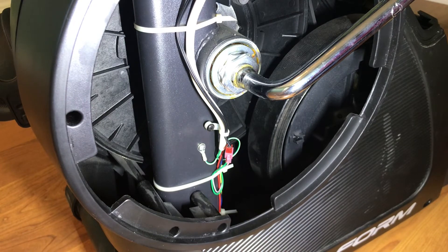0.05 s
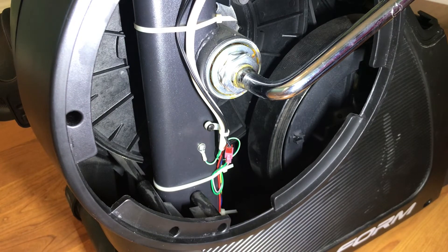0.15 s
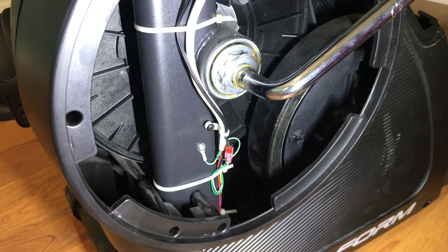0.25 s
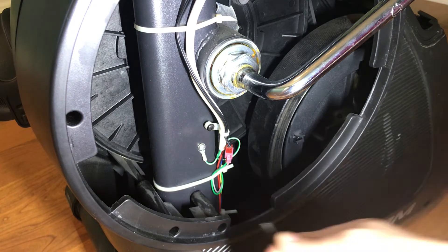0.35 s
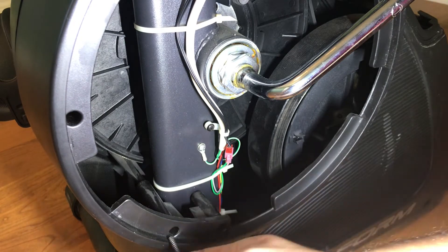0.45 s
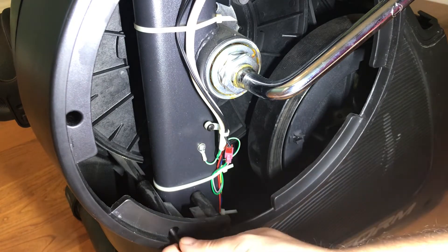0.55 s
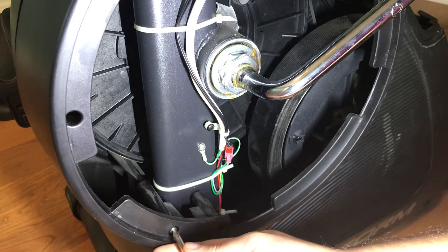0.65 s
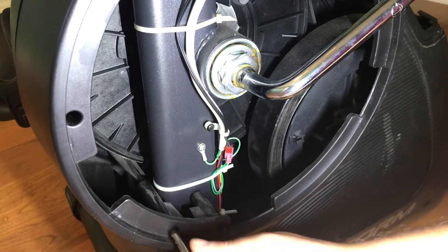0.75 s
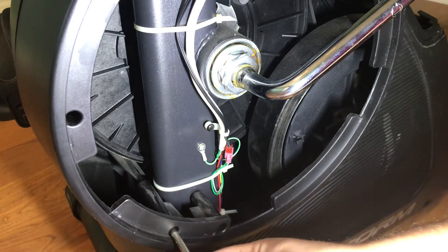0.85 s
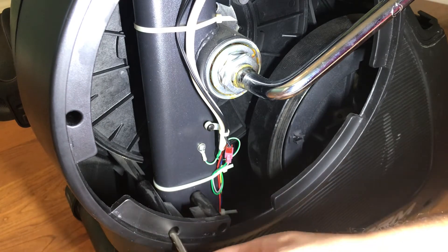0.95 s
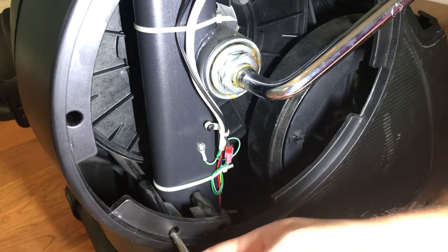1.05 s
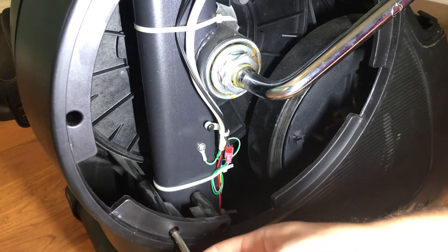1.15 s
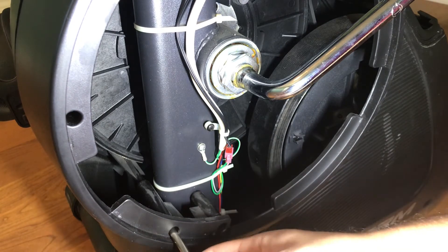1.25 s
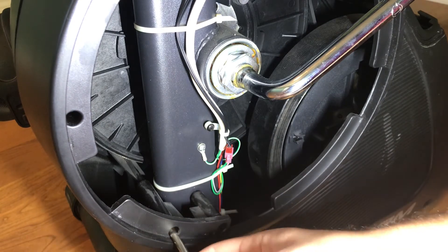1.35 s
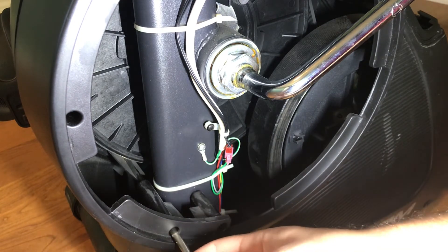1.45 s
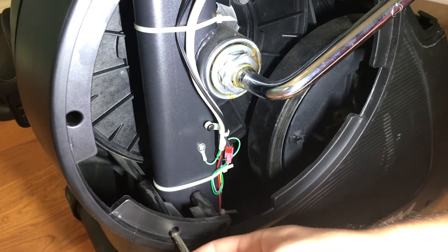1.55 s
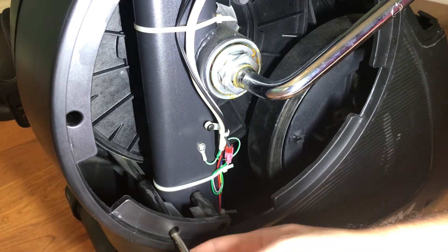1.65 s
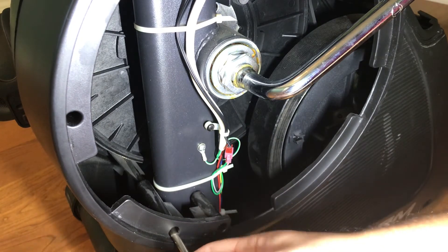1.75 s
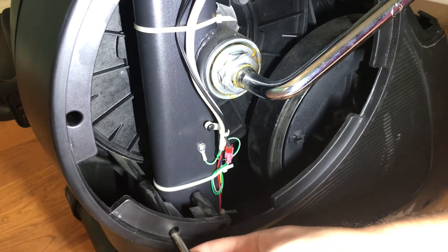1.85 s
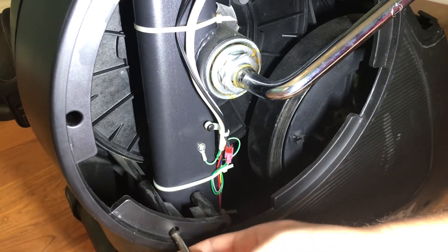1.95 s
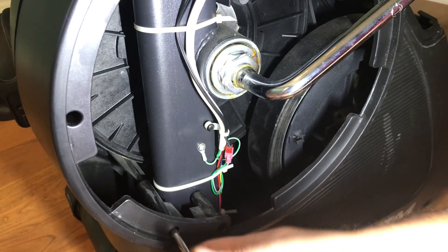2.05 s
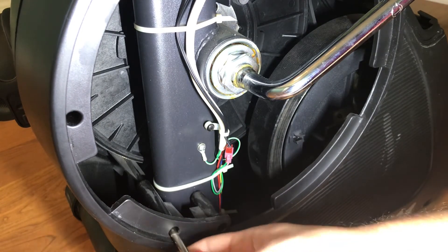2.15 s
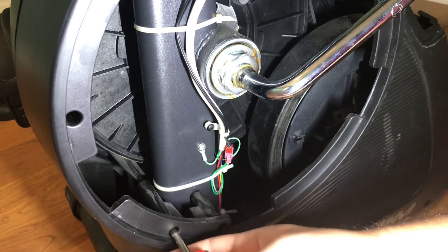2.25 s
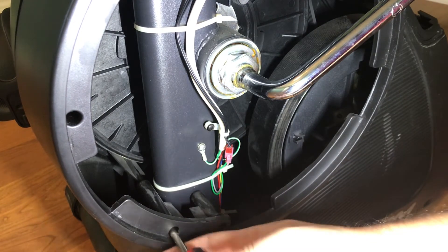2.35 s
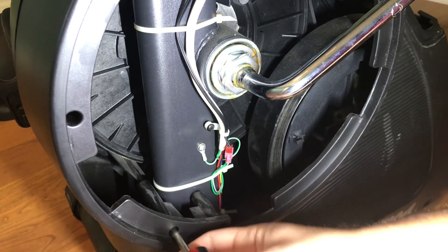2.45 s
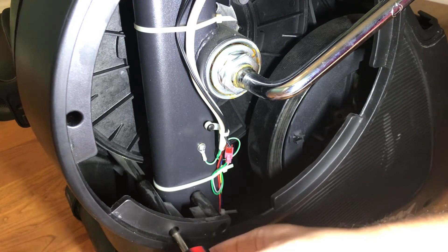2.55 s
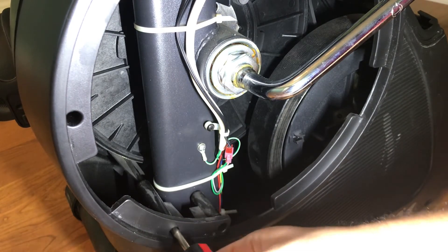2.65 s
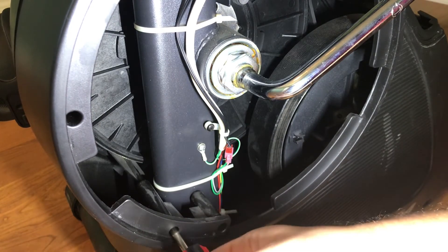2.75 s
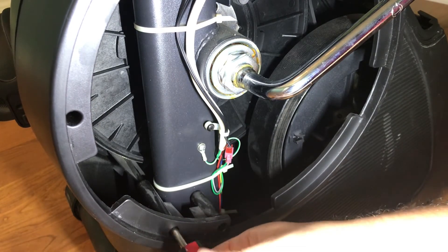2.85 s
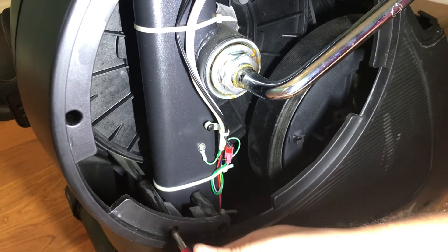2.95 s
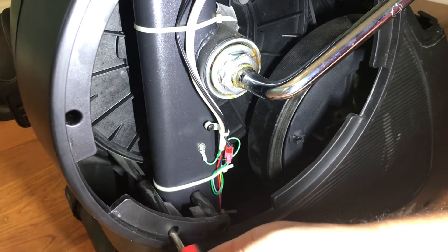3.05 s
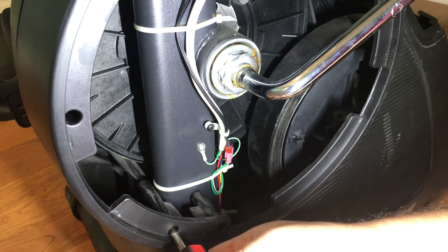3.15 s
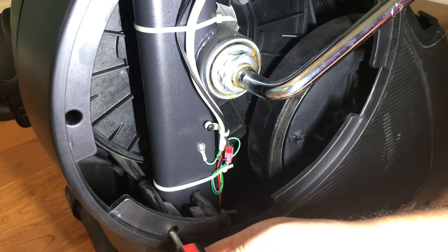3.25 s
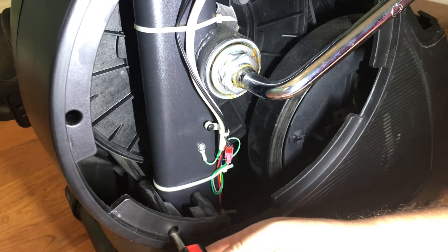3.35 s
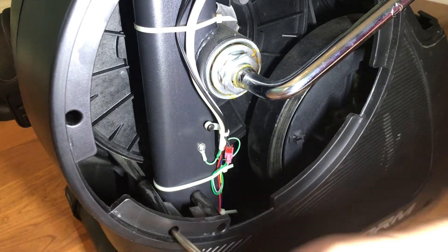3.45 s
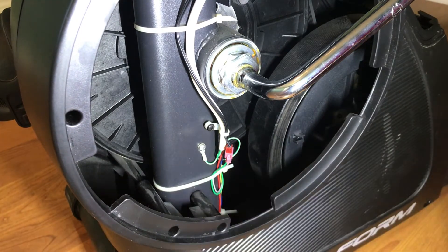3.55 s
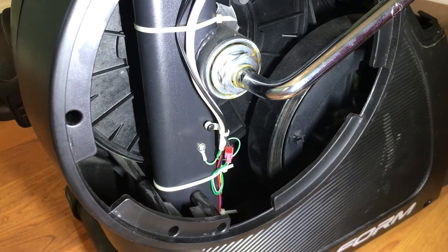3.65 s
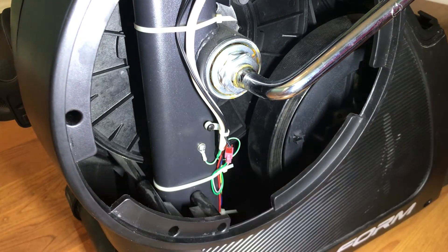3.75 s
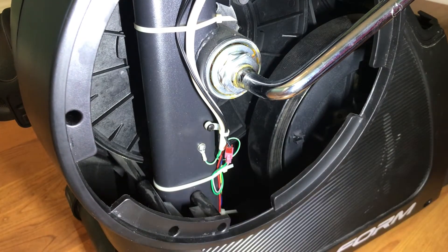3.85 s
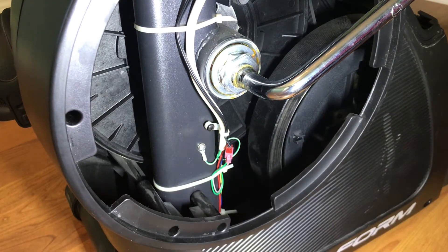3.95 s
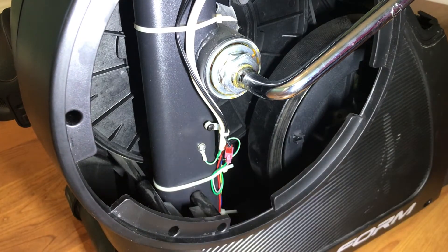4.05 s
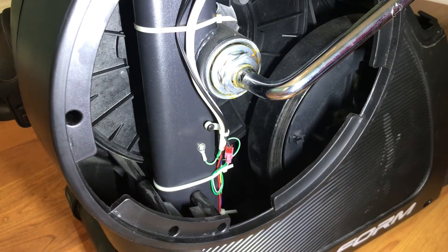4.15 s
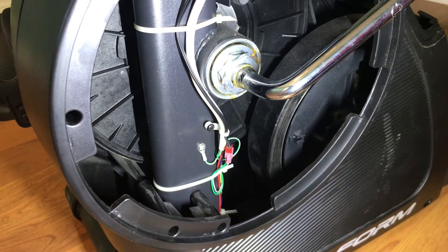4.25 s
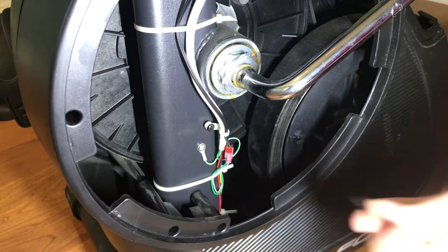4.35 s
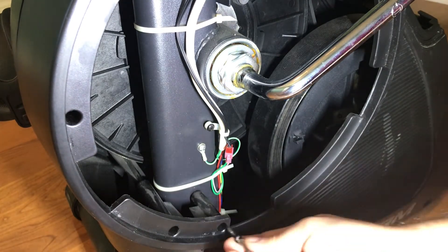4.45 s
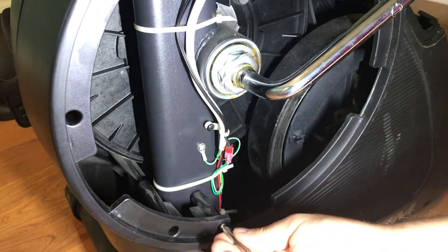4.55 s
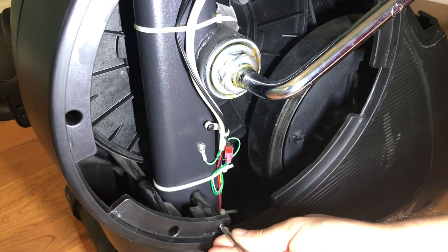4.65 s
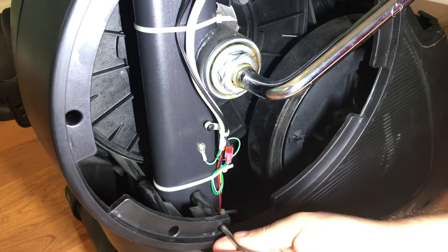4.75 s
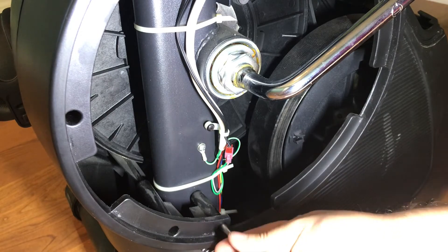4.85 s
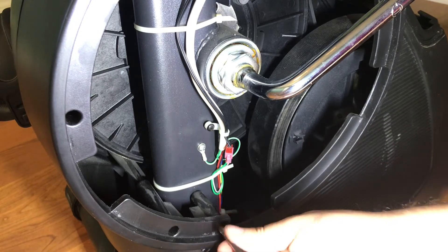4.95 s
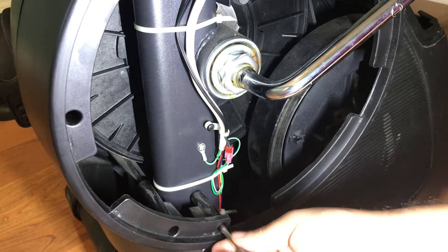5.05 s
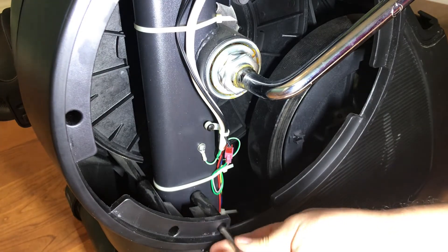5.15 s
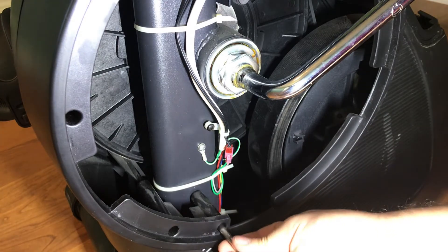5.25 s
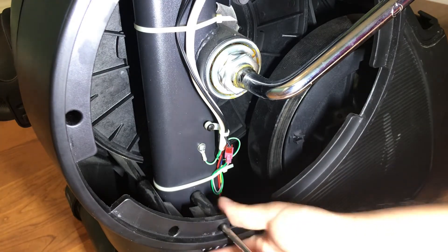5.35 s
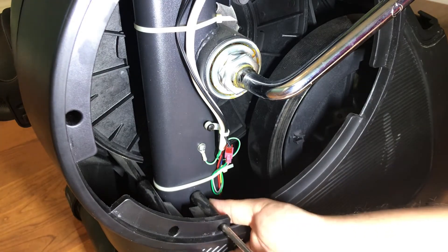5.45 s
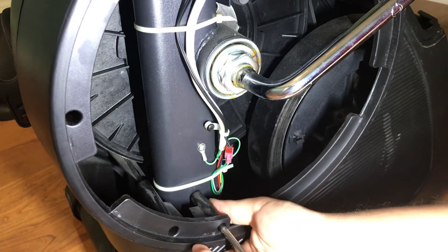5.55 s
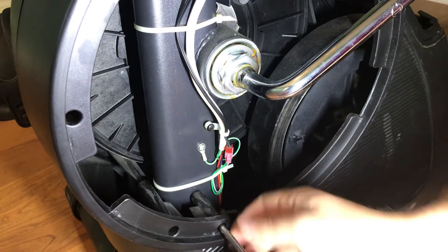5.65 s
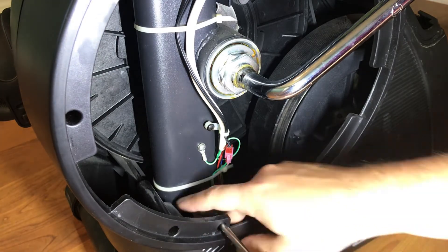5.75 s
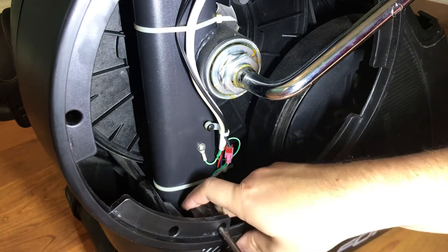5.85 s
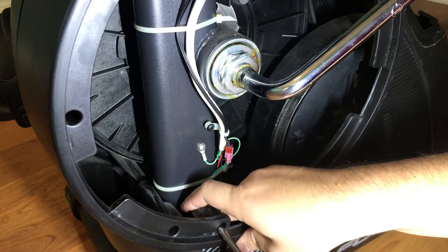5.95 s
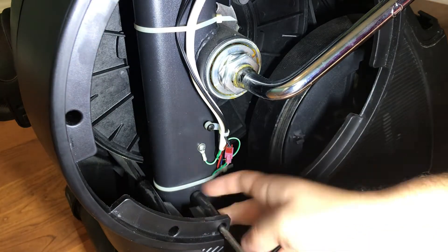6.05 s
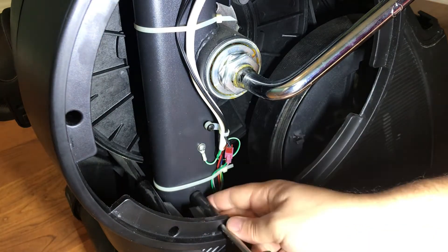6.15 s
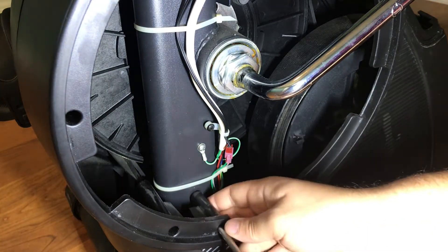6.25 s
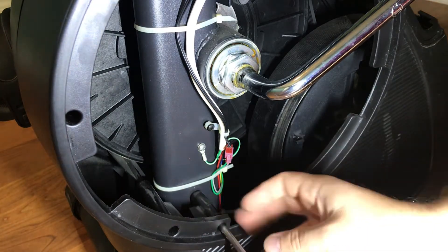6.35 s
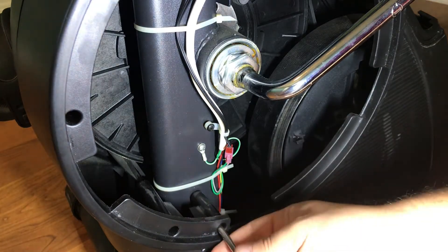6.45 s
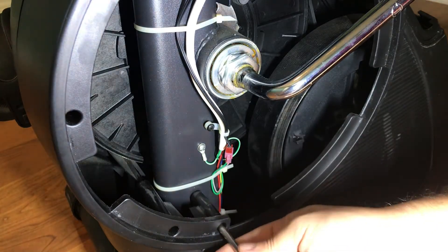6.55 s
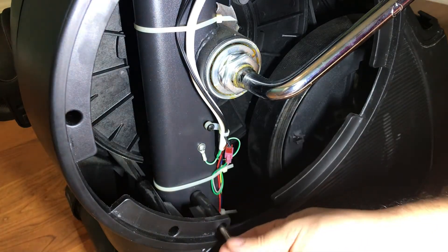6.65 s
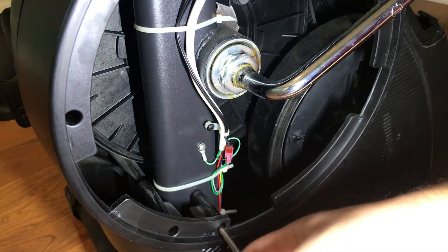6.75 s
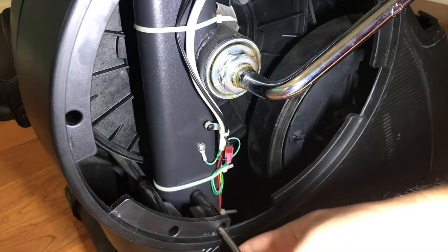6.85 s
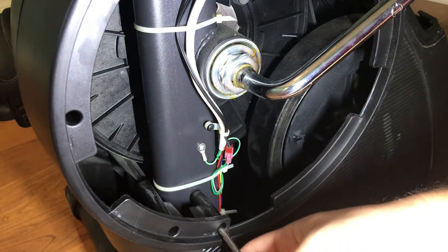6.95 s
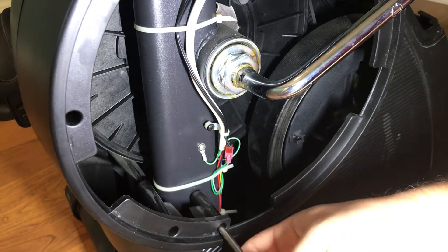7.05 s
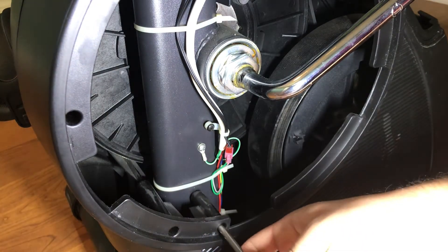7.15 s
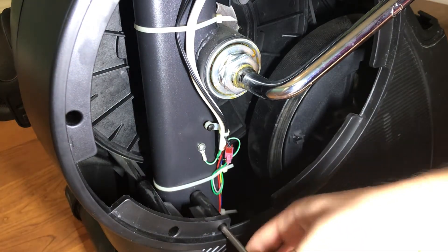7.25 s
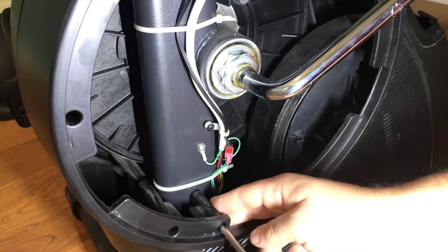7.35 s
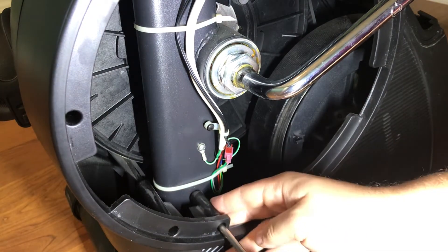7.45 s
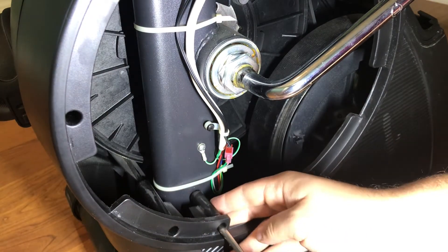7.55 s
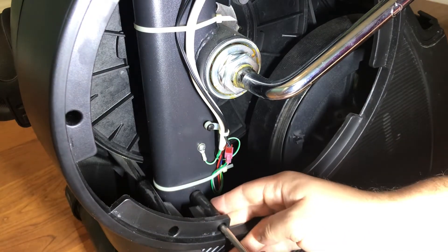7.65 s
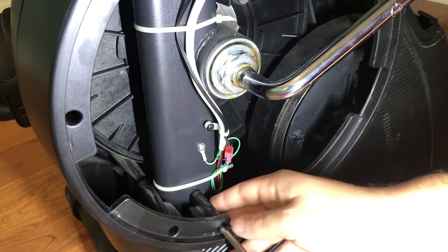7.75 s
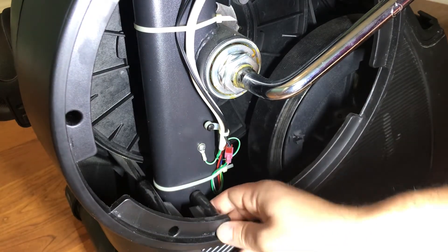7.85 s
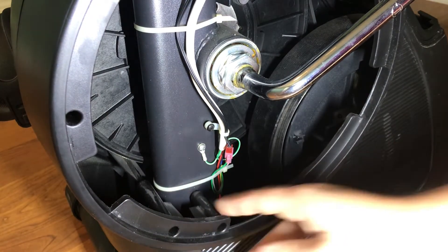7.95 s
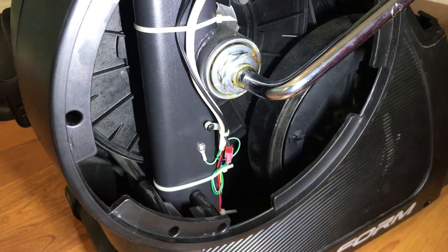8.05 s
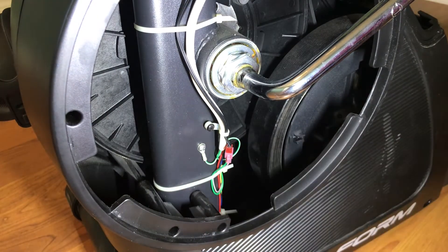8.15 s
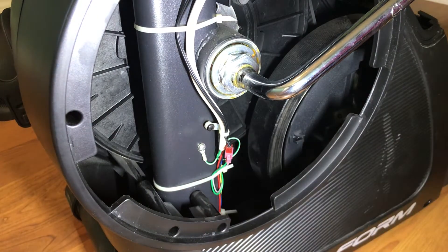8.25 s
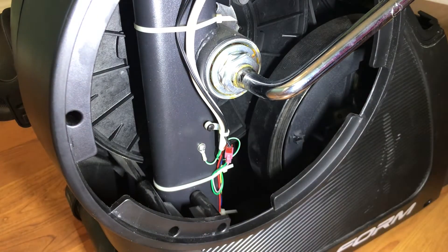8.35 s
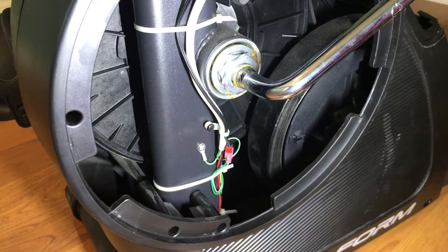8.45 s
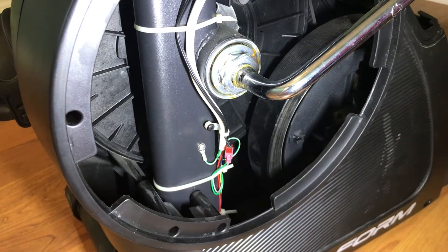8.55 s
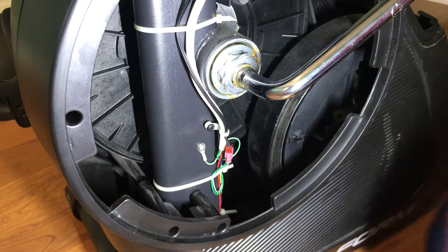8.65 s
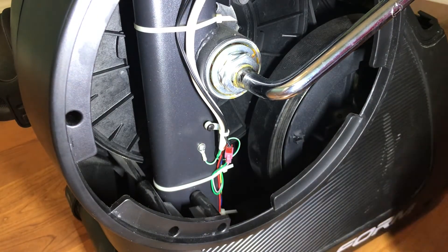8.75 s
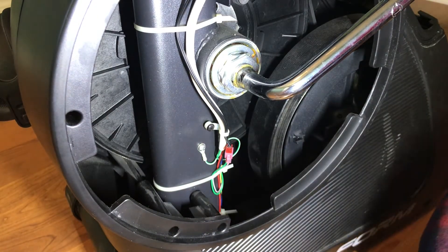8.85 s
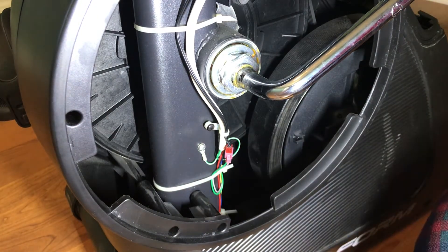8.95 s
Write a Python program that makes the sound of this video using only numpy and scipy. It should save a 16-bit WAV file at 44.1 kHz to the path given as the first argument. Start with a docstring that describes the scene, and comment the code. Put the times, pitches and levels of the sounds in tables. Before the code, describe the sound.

Close, dry cracks and low grinding of a screw thread in a plastic shell, one short squeak, then light steel rattling, scraping and taps.

```python
"""Close to the microphone in a small room, a hand turns a long screw into a hollow plastic cover.
After soft knocks and brushes the thread sticks and slips: cracks of filtered noise over a low grinding
of countless tiny slips, with one early squeak, a rough gliding tone.
Then fingers fit a second screw: its loose steel shank rattles, scrapes and pings in the hole.
Skin brushes and ticks at the end; the room's murmur and a faint hum lie behind it all."""
import sys
import numpy as np
from scipy import signal
from scipy.fft import irfft
from scipy.io import wavfile
from scipy.ndimage import uniform_filter1d

SR = 44100
rng = np.random.default_rng(int(sys.argv[2]) if len(sys.argv) > 2 else 0)


def master_out(mix):
    """Clip the mix to full scale and print it as 16-bit PCM to the path in sys.argv[1]."""
    frames = np.transpose(np.atleast_2d(mix))
    ceiling = np.clip(frames, -1, 1)
    pcm = np.round(ceiling * 32767).astype(np.int16)
    wavfile.write(sys.argv[1], SR, pcm)


N = 396900
TIME = np.arange(N) / SR
HZ = np.fft.rfftfreq(4096, 1 / SR)
MEDIUM_DB = -40  # level of a medium blow

# Levels in all tables are relative: each layer adds its own trim.
# points of contact on the cover: (wall resonance [Hz], lean of the steel from snap to ping [dB],
# level of the resonance [dB], its fade [s])
DULL = (1090, -2, -5, 0.04)
HOLLOW = (1587, -3, -3.5, 0.15)
WOODY = (2065, 8.5, -2, 0.04)
SHARP = (2400, -0.7, -2.5, .0017)
BRIGHT = (3300, 5.9, -6, 0.2)
CRISP = (3570, -7.5, -10, .001)
STEELY = (4135, 3, 0.5, 0.2)
# resonances of the plastic cover: (frequency [Hz], width [Hz], height over the dense modes between [dB])
COVER = [(247.5, 21.7, 21.5), (312.6, 39, 13.5), (479, 20, 18), (887, 13, 4), (958, 16, 6.5),
         (1060, 120, 4.5), (1207, 48, 8.5), (1333, 18, 10.5), (1507, 21, 11), (1588, 43, 10),
         (2200, 140, 2.5), (2380, 100, 1.5), (2840, 48, -1.5)]
# spectrum of the shell's thud: (frequency [Hz], level [dB per Hz])
THUD = [(60, -46.5), (130, -27), (200, -2), (300, -7.5), (600, -4.5), (850, -7), (1500, -33)]
# spectrum of the grit in rubbing contact: (frequency [Hz], level [dB per Hz])
GRIT = [(100, -52.5), (400, -4), (700, -6.5), (1300, -1), (2500, -16), (5000, -11.5), (8000, -20),
        (16000, -22)]


def amp(db):
    """Decibels to gain."""
    return 10 ** (np.asarray(db) / 20)


def unit(x):
    """Scales to rms 1."""
    return x / np.sqrt(np.mean(x ** 2) + 1e-20)


def sized(x, db):
    """Scales a short sound so that its energy equals that of 10 ms at this level."""
    return x * amp(db) * np.sqrt(SR / 100 / np.sum(x ** 2))


def read(points, hz=HZ):
    """Reads a table on a log-frequency axis."""
    f, value = np.transpose(points)
    return np.interp(np.log(hz + 1), np.log(f), value)


def along(curve, s):
    """Reads a curve at time s."""
    return np.interp(s, *np.transpose(curve))


def add(mix, s, sound):
    """Mixes a sound in at time s."""
    part = mix[max(round(s * SR), 0):][:len(sound)]
    part += sound[:len(part)]


def peaks(modes):
    """Gain in dB of resonances that stand above a flat bed."""
    power = sum(amp(db) ** 2 / (1 + (2 * (HZ - hz) / width) ** 2) for hz, width, db in modes)
    return 10 * np.log10(1 + power)


def varied(modes, spread_db=2, detune=0):
    """Each contact excites the resonances in its own proportions; a changing grip also shifts them."""
    return peaks([(hz * (1 + detune * rng.standard_normal()), width, db + spread_db * rng.standard_normal())
                  for hz, width, db in modes])


def hump(hz, octaves, steepness):
    """Gain in dB of a broad band around hz."""
    return -10 * np.log10(1 + abs(np.log2((HZ + 1) / hz) / octaves) ** steepness)


def colour(x, db):
    """Causal filter with this gain: resonances ring after the blow, never before."""
    mirrored = np.r_[db, db[-2:0:-1]]
    log_gain = np.log(amp(np.maximum(mirrored, db.max() - 100)))
    minimum_phase = np.exp(np.conj(signal.hilbert(log_gain)))
    response = irfft(minimum_phase[:len(HZ)])
    return signal.oaconvolve(x, response)[:len(x)]


def burst(fade, rise=0.00026):
    """A dense rush of noise that swells and fades quickly, as a blow scatters (times in s)."""
    t = np.arange(len(HZ) * 2) / SR
    return rng.standard_normal(len(t)) * np.exp(-t / max(fade, 1e-4)) * (1 - np.exp(-t / rise))


def ring(hz, fade, rise):
    """A single resonance swinging freely and dying away, cut off after 46 ms (times in s)."""
    t = np.arange(len(HZ)) / SR
    return np.sin(2 * np.pi * hz * t) * np.exp(-t / fade) * (1 - np.exp(-t / rise))


def blows(rows, ping_growth, thud_lag, scatter):
    """Thud, ping and snap in dB over each blow's level: heavy blows thud relatively less."""
    # the shell's thud relative to a medium blow: (time [s], level [dB])
    thud_share = [(.78, -10.5), (1.05, -4.5), (2.0, -11.5), (2.84, -14.5), (3.4, -10.5), (5.4, -14.5),
                  (5.68, -8), (5.9, -35), (6.24, -15), (6.4, -10), (6.85, 1.5), (7.15, -9.5), (7.3, -5.5),
                  (7.9, -10)]
    detune = 1 + scatter * rng.standard_normal(len(rows))  # no two blows land on quite the same point
    out = []
    for (s, db, (hz, lean, _, _), hard), off in zip(rows, detune):
        thud = along(thud_share, s) - thud_lag * (db - MEDIUM_DB)
        ping = hard + ping_growth * max(hard, 0) + lean / 2
        snap = hard - lean / 2
        out.append((s, db, hz * off, thud, ping, snap))
    return out


def chatter(curve, level_db, spread_db, hard_db, hard_spread_db, count):
    """Weak catches of the thread, unevenly spaced, their strength following the grinding."""
    from_s, to_s = 1.15, 3  # the thread bites hardest in between
    place, spot = rng.random((count, 2)).T
    size, hard = rng.standard_normal((count, 2)).T
    s = from_s + (to_s - from_s) * (np.arange(count) + place) / count
    level = along(curve, s) + level_db + spread_db * size
    spots = [(DULL, HOLLOW, SHARP, BRIGHT)[k] for k in (spot * 4).astype(int)]
    return list(zip(s, level, spots, np.minimum(hard_db + hard_spread_db * hard, 1)))


def clicks(rows, screw, fade, smear, octaves, shell_scale, knock_db, thud_db, ping_db, snap_db, lead_in_db):
    """Each blow knocks the wall, thuds in the shell, rings the screw and snaps at the contact."""
    # spectrum of the struck steel: (frequency [Hz], level [dB per Hz])
    ping_spectrum = [(100, -60), (2300, -36), (3400, -11), (3900, -9.5), (5400, -11.5), (6200, -22.5),
                     (9000, -27.5)]
    # spectrum of the snap at the contact: (frequency [Hz], level [dB per Hz])
    snap_spectrum = [(100, -66), (3500, -38), (5000, -9.5), (5900, -0.5), (7500, -2), (11000, -3),
                     (16000, -15.5)]
    plastic, metal = np.zeros(N), np.zeros(N)
    wall, shell = hump(1660, 1.496, 8.2), read(THUD, HZ * shell_scale)
    for s, db, hz, thud, ping, snap in rows:
        cover, steel = varied(COVER), varied(screw, detune=0.006)
        # weak slips are short rubs that swell; strong ones crack at once
        rise = 0.00059 + smear * np.clip((-46.5 - db) / 10, 0, 1)
        # the point of contact sets the broad colour of the knock
        knock = colour(burst(fade + rise / 2, rise), cover + wall + hump(hz, octaves, 6.8))
        add(plastic, s, sized(knock, db + knock_db))
        # the hand resting on the shell half damps its low resonances
        thump = colour(burst(2.5 * fade, rise=0.0028), cover / 2 + shell)
        add(plastic, s, sized(thump, db + thud + thud_db))
        # a harder contact is shorter, so its snap reaches higher
        edge = 0.98 * np.clip(snap + 4, -6, 6) * np.log2(np.maximum(HZ / 7000, 1))
        crack = colour(burst(.5 * fade + rise / 2, rise / 2), steel + read(snap_spectrum) + edge)
        add(plastic, s, sized(crack, db + snap + snap_db))
        # the harder the steel is struck, the more of its sound lies in the first instant
        steel_fade = 0.85 * fade * amp(-.35 * max(ping, 0))
        clink = colour(burst(steel_fade, rise), steel + read(ping_spectrum))
        add(metal, s, sized(clink, db + ping + ping_db))
        # a faint gritty burst comes a few milliseconds before each blow
        lead_in = colour(burst(fade, rise=0.00033), cover + steel + read(GRIT))
        add(plastic, s - rng.uniform(.002, 0.0065), sized(lead_in, db + lead_in_db))
    return plastic, metal


def wall_ring(rows, level_db, hard_loss, scatter, rise=.0016):
    """The point of contact picks out one wall resonance, the more clearly the softer the blow is."""
    out = np.zeros(N)
    for (s, db, (hz, _, ring_db, fade), hard), off in zip(rows, rng.standard_normal(len(rows))):
        tone = ring(hz * (1 + scatter * off), fade, rise)
        add(out, s, sized(tone, db + ring_db + level_db - hard_loss * hard))
    return out


def friction(curve, grit_db, shudder_db, shudder_growth, per_s, spread_db, jolts_per_s,
             clump_db=3, octaves=0.5, count=14):
    """Countless tiny slips, each in one of many pitch bands, excite the cover; sparser jolts shake the shell."""
    s, grit = np.transpose(curve)
    shudder = grit.max() + shudder_growth * (grit - grit.max())  # the shell's shudder follows the rubbing
    sizes = rng.choice([-1, 1], N) * amp(spread_db * np.minimum(rng.exponential(1, N), 2.5))
    slips = sizes * (rng.random(N) < per_s / SR)
    jolts = sizes * (rng.random(N) < jolts_per_s / SR)
    spot, grains = rng.integers(0, count, N), np.zeros(N)
    for k, hz in enumerate(np.geomspace(750, 12000, count)):
        grain = colour(burst(0.0038, rise=0.00037), hump(hz, octaves, 2.5))
        grains += signal.oaconvolve(slips * (spot == k), grain)[:N]
    high = unit(colour(grains, read(GRIT) + 0.51 * peaks(COVER)))
    high *= amp(np.interp(TIME, s, grit) + grit_db)
    low = unit(colour(jolts, read(THUD) + 0.76 * peaks(COVER) + hump(313, 0.89, 5.2)))
    low *= amp(np.interp(TIME, s, shudder) + shudder_db)
    # the slips come in bunches
    clumps = unit(uniform_filter1d(uniform_filter1d(rng.standard_normal(N), 700), 350))
    ends = np.clip(np.minimum(TIME - s[0], s[-1] - TIME) / 0.02, 0, 1)
    return (high + low) * amp(clump_db * clumps) * ends


def rubs(rows, slips_per_s=750, spread_db=4, fade=0.0012, octaves=0.89, tilt_db=-3.0, level_db=-1):
    """Each scrape is a quick, uneven train of tiny slips that swells and dies."""
    out, tilt = np.zeros(N), tilt_db * np.log2(np.maximum(HZ / 1000, 1))
    for s, db, length, hz in rows:
        train, count = np.zeros(2 * len(HZ)), max(round(length * slips_per_s), 2)
        for place in (np.arange(count) + rng.random(count)) / count:
            swell = np.sqrt(np.sin(np.pi * place))
            add(train, place * length, burst(fade) * swell * amp(spread_db * rng.standard_normal()))
        scrape = colour(train, hump(hz, octaves, 3.45) + tilt + 0.59 * varied(COVER))
        add(out, s, sized(scrape, db + level_db))
    return out


def squeak(jitter=0.085, rasp=0.55, level_db=-1, octave=0.12):
    """Slips of the thread follow each other so fast that they become a rough tone."""
    # the squeaking thread: (time [s], level [dB], pitch [Hz])
    glide = [(.69, -62, 1309), (0.728, -50, 1287), (.738, -37, 1254), (0.746, -48, 1218), (.757, -50, 1200),
             (0.768, -40, 1170), (0.779, -45, 1135)]
    s, db, hz = np.transpose(glide)
    wander = unit(uniform_filter1d(rng.standard_normal(N), 60))
    phase = 2 * np.pi * np.cumsum(np.interp(TIME, s, hz) * (1 + jitter * wander)) / SR
    rub = unit(colour(rng.standard_normal(N) * (1 + np.cos(phase)), hump(4000, 0.16, 1.7)))
    tone = unit(np.sin(phase) + octave * np.sin(2 * phase))
    stroke = amp(np.interp(TIME, s, db) + level_db) * (TIME > s[0]) * (TIME < s[-1])
    return colour((tone + rasp * rub) * stroke, hump(3130, 1.43, 40))  # the small contact radiates no bass


def shank_ring(rows, scatter=0.007, rise=0.00053, spread_db=1.5):
    """Each tap sets the loose screw bending: brief, nearly pure pings that the fingers damp."""
    # bending modes of the loose screw: (frequency [Hz], fade [s], level [dB])
    bending = [(4560, .0021, -6), (4135, .002, -17), (7960, .0015, -20)]
    out = np.zeros(N)
    for s, db, _, _, ping, _ in rows:
        for hz, fade, mode_db in bending:
            off, size = rng.standard_normal(2)
            tone = ring(hz * (1 + scatter * off), fade, rise)
            add(out, s, sized(tone, db + ping + mode_db + spread_db * size))
    return out


def skids(rows, level_db=-12.0, length=.024, delay=0.0066):
    """After a tap the loose screw skids on a little way across the plastic."""
    return [(s + delay, min(db, MEDIUM_DB) + level_db, length * (.6 + chance), hz * (1 + chance))
            for (s, db, (hz, *_), _), chance in zip(rows, rng.random(len(rows)))]


def hand(grain_db=3, rush_db=-6.5, tone_db=-8.5):
    """Low, soft knocks of the shell in noise and tone, brushing skin as grainy hiss, and tiny dry ticks."""
    # low, soft knocks of the shell, some of them beneath cracks and taps: (time [s], level [dB], centre [Hz])
    soft_knocks = [(0.264, -52, 376), (0.368, -58, 448), (.778, -29.5, 898), (.78, -42, 480),
                   (0.971, -51, 815), (1.018, -38, 453), (1.875, -46, 328), (2.103, -43.5, 350),
                   (2.283, -47, 450), (2.456, -43, 296), (2.885, -45, 350), (3.047, -53, 583),
                   (3.145, -53, 350.5), (3.618, -55.5, 920), (4.527, -56.5, 1200), (5.679, -41.5, 530),
                   (6.072, -47.5, 520), (6.62, -45, 570), (6.765, -49.5, 503), (7.112, -52, 380),
                   (7.25, -46, 540), (7.263, -45.5, 307), (7.432, -48, 633), (7.445, -43, 410),
                   (7.742, -50, 360)]
    # the hand brushing past: (time [s], level [dB], rise [s], fade [s])
    brushes = [(.215, -56, .002, 0.03), (.31, -71.5, .02, 0.15), (3.809, -62, 0.012, 0.013),
               (4.29, -77, .09, .1), (4.406, -69.5, 0.002, 0.2), (5.38, -68, 0.042, 0.019),
               (8.42, -61, 0.0086, 0.049), (8.619, -60, 0.053, 0.04)]
    # ticks of skin and nail: (time [s], level [dB])
    ticks = [(4.025, -73), (4.04, -71), (8.122, -63), (8.721, -61), (8.797, -62), (8.969, -62.5)]
    # spectrum of skin contact: (frequency [Hz], level [dB per Hz])
    skin = [(100, -43), (600, 7), (2000, -3.5), (4500, 0.5), (8000, -0.5), (15000, 3.5)]
    out = np.zeros(N)
    for s, db, hz in soft_knocks:
        add(out, s, sized(colour(burst(0.0062, rise=0.003), hump(hz, 0.75, 7.6)), db + rush_db))
        add(out, s, sized(ring(hz, fade=.006, rise=.003), db + tone_db))
    for s, db in ticks:
        add(out, s, sized(colour(burst(0.0012), read(skin)), db))
    grain = amp(grain_db * unit(uniform_filter1d(rng.standard_normal(N), 90)))
    hiss = unit(colour(grain * rng.standard_normal(N), read(skin)))
    for s, db, rise, fade in brushes:
        swell = np.clip((TIME - s) / rise, 0, 1)
        out += hiss * amp(db + 5.0) * swell * np.exp(-np.maximum(TIME - s - rise, 0) / fade)
    return out


def tail(build=0.0016):
    """Dense reflections from the hollow housing, floor and walls; each pitch fades at its own rate."""
    # reverberation of the room: (frequency [Hz], time to fall by 60 dB [s])
    room_t60 = [(200, 0.59), (530, 0.14), (1400, 0.18), (3700, 0.26), (9700, 0.19), (16000, 0.13)]
    # the air inside the housing rings on: (frequency [Hz], width [Hz], height [dB])
    cavity = [(536, 13, -3), (563, 20, 9.5)]
    hz, t, z = signal.stft(rng.standard_normal(SR // 2), SR, nperseg=256)
    decay = amp(-60 * t / read(room_t60, hz)[:, None])
    echoes = signal.istft(z * decay, SR, nperseg=256)[1]
    echoes *= 1 - np.exp(-(np.arange(len(echoes)) / SR / build) ** 2)
    return colour(echoes / np.linalg.norm(echoes), peaks(cavity))


def room(x, drift_hz=.9, count=3):
    """Several dense echo tails slowly trade places, so that no pitch lingers."""
    shares = [np.cos(np.pi * (2 * drift_hz * TIME + k / count)) * np.sqrt(2 / count) for k in range(count)]
    return sum(signal.fftconvolve(x * share, tail())[:N] for share in shares)


def background(noise_db=-65.7, hum_db=-1.0, waver_db=1.5):
    """Low murmur of the room's air with a faint hiss, as shaped noise, and a wavering hum of sines."""
    # spectrum of the room's air: (frequency [Hz], level [dB per Hz])
    room_noise = [(15, -73), (25, -53), (108, -24.5), (161, -7.5), (236, -6), (270, -6), (476, -7),
                  (695, -14.5), (1260, -18.5), (1520, -20.5), (2350, -24.5), (16000, -33.5)]
    # faint hum in the room: (frequency [Hz], level [dB])
    hum = [(177.6, -78.5), (231.5, -73.5), (479.1, -78), (963.6, -83)]
    out = unit(colour(rng.standard_normal(N), read(room_noise))) * amp(noise_db)
    for hz, db in hum:
        waver = unit(uniform_filter1d(uniform_filter1d(rng.standard_normal(N), 8000), 4000))
        tone = np.sin(2 * np.pi * hz * TIME + waver) * amp(waver_db * waver)
        out += unit(tone) * amp(db + hum_db)
    return out


def scene():
    """Both screws and the hand, close by and through the room's reflections, over the background."""
    # the thread slipping in the plastic, and the tool knocking in the screw head:
    # (time [s], level [dB], point of contact, hardness of the contact [dB])
    slip_rows = [(0.4817, -57, CRISP, 6), (0.521, -55, CRISP, 5.5), (0.5828, -53.5, CRISP, 5.5),
                 (.6161, -44, CRISP, 3.5), (0.6357, -40.5, BRIGHT, -7.5), (0.7452, -46, SHARP, 1.5),
                 (0.7787, -30, DULL, -16), (.7872, -41.5, HOLLOW, -6), (0.9005, -44, CRISP, -13.5),
                 (1.0105, -37, SHARP, -12), (1.0168, -42, SHARP, 6), (1.0222, -40.5, SHARP, -4),
                 (1.0972, -44, HOLLOW, -3.5), (1.1107, -46, DULL, -27), (1.2003, -39.5, SHARP, -8),
                 (1.2671, -46.5, SHARP, -17), (1.2926, -43.5, HOLLOW, -13), (1.3226, -43.5, SHARP, -20),
                 (1.3309, -42, HOLLOW, -7.5), (1.4236, -51, HOLLOW, -4), (1.4369, -47, HOLLOW, -32),
                 (1.5448, -57, DULL, 6.5), (1.6343, -53, DULL, 5), (1.6815, -43, DULL, -14),
                 (1.7155, -46, HOLLOW, -12), (1.7933, -49.5, HOLLOW, -6.5), (1.8686, -41.5, SHARP, -2.5),
                 (1.9305, -41, BRIGHT, -14), (1.949, -39, SHARP, -11.5), (2.016, -38, HOLLOW, -17),
                 (2.0272, -41, HOLLOW, -17), (2.1042, -36.5, HOLLOW, -9.5), (2.1566, -33, SHARP, -7),
                 (2.2357, -41.5, SHARP, -23), (2.2529, -42.5, SHARP, -11), (2.3181, -39.5, SHARP, -8.5),
                 (2.337, -39.5, SHARP, -13), (2.398, -37, SHARP, -7), (2.4555, -30, DULL, -4),
                 (2.6243, -39.5, SHARP, -5.5), (2.6656, -35, BRIGHT, -8.5), (2.72, -43, SHARP, -4.5),
                 (2.8205, -45, HOLLOW, -11), (2.8419, -28.5, DULL, -3.5), (2.8918, -35, SHARP, -3),
                 (3.222, -54, SHARP, -7), (3.2995, -44, CRISP, -9), (3.4135, -37, BRIGHT, 6.5),
                 (3.4672, -49.5, SHARP, 6.5)]
    # the loose screw tapping in its hole: (time [s], level [dB], point of contact, hardness [dB])
    tap_rows = [(4.5759, -43.5, DULL, -0.5), (4.789, -42, DULL, -1), (4.7967, -39.5, SHARP, -4.5),
                (4.8343, -49, DULL, -2), (4.926, -47, DULL, -5), (4.9626, -44.5, WOODY, -17),
                (4.9932, -47.5, WOODY, -17), (5.0293, -49, STEELY, -2), (5.0464, -40, DULL, -1),
                (5.1265, -39.5, DULL, 1), (5.1461, -41, WOODY, -8), (5.1792, -45, DULL, 3.5),
                (5.2465, -54, BRIGHT, 4.5), (5.2644, -42.5, WOODY, -2), (5.3315, -49.5, WOODY, -14),
                (5.3553, -56, WOODY, -7), (5.5871, -43, SHARP, -0.5), (5.6782, -39, DULL, -18),
                (5.6981, -40.5, CRISP, -3.5), (5.8038, -48, SHARP, -1), (5.8713, -46, DULL, -3),
                (5.9326, -43, WOODY, -7), (5.9335, -46, STEELY, -7), (5.983, -54.5, WOODY, -6),
                (6.0655, -51.5, DULL, -3), (6.2132, -37, DULL, -3.5), (6.2362, -39, DULL, -8.5),
                (6.293, -47.5, SHARP, -14), (6.326, -42.5, CRISP, -4.5), (6.3425, -48, CRISP, -4),
                (6.3752, -47, SHARP, 1.5), (6.442, -49.5, WOODY, -8), (6.4643, -33, BRIGHT, 2.5),
                (6.5202, -48.5, DULL, 2), (6.6048, -47.5, WOODY, -5), (6.6154, -37, DULL, -1),
                (6.7755, -51, DULL, -0.5), (6.829, -52, WOODY, -5), (6.8852, -38.5, SHARP, -4.5),
                (6.9803, -51, WOODY, -5), (7.1495, -40, DULL, -1), (7.153, -37.5, DULL, -16),
                (7.1551, -39.5, BRIGHT, 10.5), (7.2485, -40.5, SHARP, -10.5), (7.3105, -42.5, CRISP, -4),
                (7.43, -52.5, DULL, -6), (7.5247, -42.5, BRIGHT, -4.5), (7.5411, -47, SHARP, -12),
                (7.5774, -51, BRIGHT, -1), (7.7331, -43, SHARP, -8.5), (7.7679, -43, DULL, 2),
                (7.7937, -57, DULL, 9.5), (7.9052, -42.5, SHARP, 0), (7.9065, -45.5, STEELY, -6),
                (8.0068, -58, HOLLOW, 0)]
    # short scrapes of steel on plastic: (time [s], level [dB], length [s], centre [Hz])
    rub_rows = [(.728, -52, 0.013, 4200), (.742, -45, .018, 2200), (.745, -44, .03, 4500),
                (0.779, -35.5, .01, 3970), (.788, -40, .025, 1550), (1.005, -46, 0.0086, 1500),
                (1.158, -58, 0.014, 4500), (1.302, -45, 0.021, 1600), (1.406, -49, .03, 3800),
                (1.508, -50, .012, 5000), (1.592, -48, 0.016, 5030), (1.747, -51, 0.024, 5000),
                (1.822, -54, 0.0098, 5500), (1.837, -47.5, 0.016, 5000), (1.973, -50, 0.013, 4500),
                (2.083, -47, .012, 1500), (2.258, -40, 0.023, 1200), (2.383, -54, 0.013, 1298),
                (2.448, -48, 0.0072, 1300), (2.545, -46, 0.013, 1700), (2.566, -54, 0.0085, 6000),
                (2.462, -39, .02, 1550), (2.85, -37, .022, 1550), (2.737, -44.5, 0.012, 2200),
                (2.752, -49, 0.023, 1887), (3.054, -54, 0.032, 1702), (3.065, -55.5, 0.023, 7000),
                (3.144, -56, .008, 1700), (3.17, -57.5, .014, 3520), (3.355, -54.5, .006, 2490),
                (3.409, -46, 0.00487, 2002), (3.428, -40, 0.03, 1500), (4.782, -49, 0.0082, 3503),
                (4.84, -49.5, 0.0066, 2400), (4.857, -51, 0.0093, 2407), (5.059, -46, 0.013, 3500),
                (5.443, -59.5, 0.011, 1700), (5.544, -56.5, 0.011, 4610), (5.616, -48.5, .008, 7000),
                (5.805, -49.5, .014, 2810), (5.863, -49, 0.019, 1692), (5.935, -49, 0.012, 3490),
                (6.024, -53, 0.0089, 3500), (6.072, -49.5, .018, 1300), (6.195, -51, .014, 2190),
                (6.31, -47, .014, 2000), (6.422, -47.5, .006, 3997), (6.459, -42, .005, 3000),
                (6.581, -50.5, .009, 3490), (6.862, -50.5, 0.0071, 2607), (6.887, -39.5, 0.0091, 2789),
                (7.11, -59, 0.011, 1705), (7.166, -41, 0.027, 5000), (7.278, -53, .012, 2400),
                (7.313, -48, 0.0098, 6000), (7.316, -43.5, 0.017, 1300), (7.761, -54, 0.0079, 3500),
                (7.775, -42.5, 0.03, 4600), (7.78, -46, 0.023, 1250)]
    # the thread grinding as the screw is driven home, then the tool easing out of its head:
    # (time [s], level [dB])
    grind_curve = [(.48, -65), (.57, -77), (.74, -65), (.88, -63), (1.15, -59), (1.6, -52.5), (1.95, -52.5),
                   (2.15, -49.5), (2.42, -51), (2.6, -59.5), (2.74, -54.5), (2.93, -54.5), (3.01, -62),
                   (3.1, -56.5), (3.42, -65)]
    # the loose screw scraping in its hole: (time [s], level [dB])
    scrape_curve = [(4.67, -61), (4.78, -52), (4.92, -64), (5.1, -59), (5.3, -58), (5.41, -62), (5.52, -75),
                    (5.65, -65), (6.08, -52.5), (6.17, -60), (6.33, -54.5), (6.7, -57), (7.08, -75),
                    (7.3, -62), (7.68, -96), (7.78, -54), (8.1, -71)]
    # resonances of the tight screw: (frequency [Hz], width [Hz], height [dB])
    tight_screw = [(4420, 120, 1), (4990, 96, 5), (5300, 100, 6), (6560, 310, 8), (9470, 200, 2.5)]
    # resonances of the loose screw: (frequency [Hz], width [Hz], height [dB])
    loose_screw = [(4130, 120, 4), (4630, 650, 11), (7900, 420, 3.5), (10580, 400, -6), (14926, 1100, 4)]
    # pitches the cover hardly radiates when driven at the tight screw: (frequency [Hz], width [Hz], depth [dB])
    nodes = [(696, 90, 5.5), (1410, 23, 0.5), (1940, 46, 6)]

    catches = chatter(grind_curve, level_db=-4.0, spread_db=2.0, hard_db=-13, hard_spread_db=3.5, count=30)
    slipping = blows(slip_rows + catches, ping_growth=-0.64, thud_lag=0.043, scatter=0.03)
    cracks, shank = clicks(slipping, tight_screw, fade=0.0052, smear=0.0033, octaves=1.79, shell_scale=0.92,
                           knock_db=-0.1, thud_db=-4.5, ping_db=-1.0, snap_db=-1.5, lead_in_db=-15.0)
    grinding = friction(grind_curve, grit_db=-4.0, shudder_db=-5.0, shudder_growth=1.12,
                        per_s=950, spread_db=3.5, jolts_per_s=130)
    tapping = blows(tap_rows, ping_growth=0.27, thud_lag=.15, scatter=0.023)
    taps, pings = clicks(tapping, loose_screw, fade=0.0065, smear=0.0019, octaves=1.73, shell_scale=0.795,
                         knock_db=-2.0, thud_db=-3.5, ping_db=-4, snap_db=-2.0, lead_in_db=-21.5)
    scraping = friction(scrape_curve, grit_db=-6.0, shudder_db=-20, shudder_growth=0.25,
                        per_s=300, spread_db=3.5, jolts_per_s=50)

    near = colour(cracks + grinding, -peaks(nodes)) + shank + taps + scraping
    near += rubs(rub_rows + skids(tap_rows)) + squeak() + hand()
    ringing = pings + shank_ring(tapping)
    ringing += wall_ring(slip_rows, level_db=-2.0, hard_loss=0.089, scatter=.02)
    ringing += wall_ring(tap_rows, level_db=-3.0, hard_loss=0.2, scatter=.015)
    # the loose screw and the outer wall face the open air,
    # so their ringing arrives drier than the sounds from within the cover
    reflected = room(near + amp(-7) * ringing)
    return (near + ringing + amp(-5.5) * reflected + background())[None]


def record(dry):
    """The recorder's band limit: a steep low-pass at 16250 Hz."""
    low_pass = signal.firwin(401, 16250, window=("kaiser", 8), fs=SR)
    return signal.oaconvolve(dry, low_pass[None], "same")


dry = scene()
out = record(dry)
master_out(out)
```